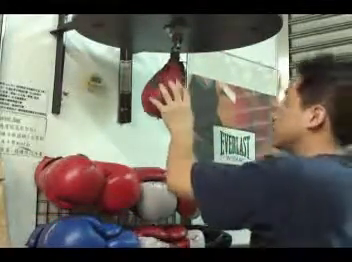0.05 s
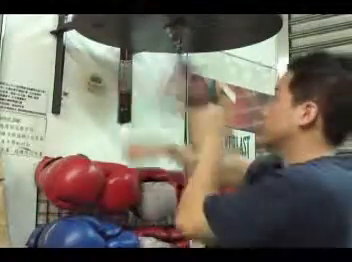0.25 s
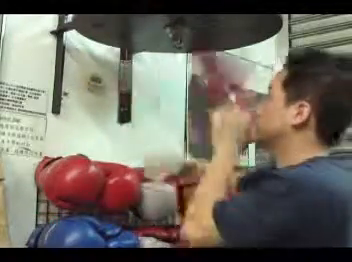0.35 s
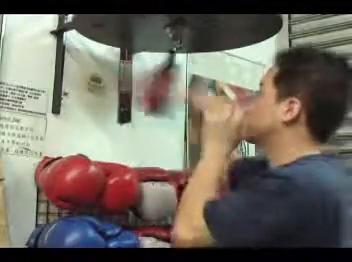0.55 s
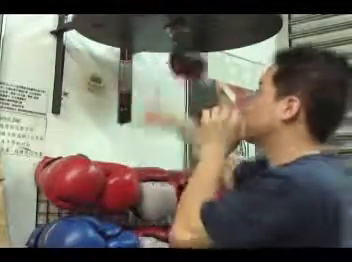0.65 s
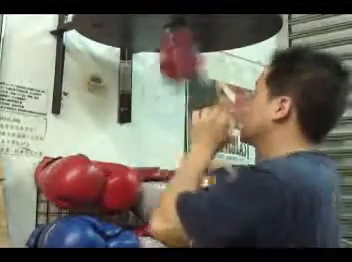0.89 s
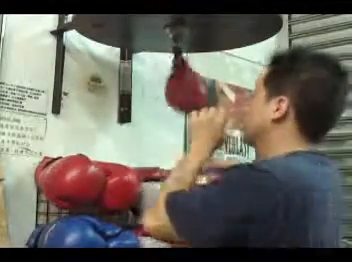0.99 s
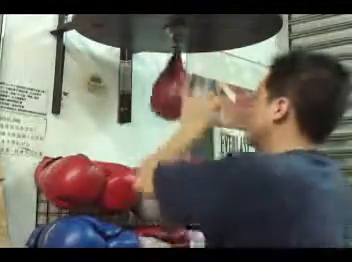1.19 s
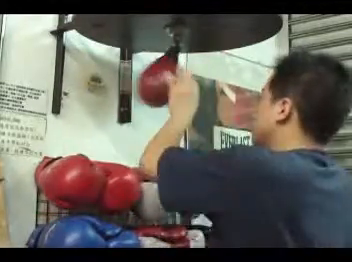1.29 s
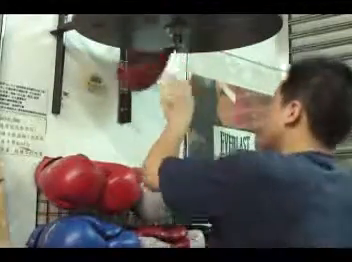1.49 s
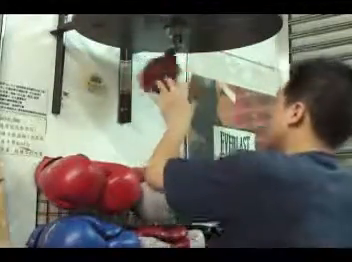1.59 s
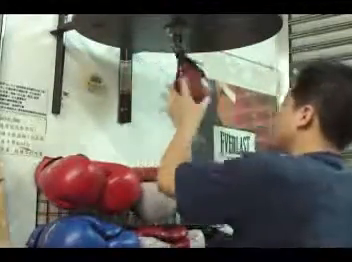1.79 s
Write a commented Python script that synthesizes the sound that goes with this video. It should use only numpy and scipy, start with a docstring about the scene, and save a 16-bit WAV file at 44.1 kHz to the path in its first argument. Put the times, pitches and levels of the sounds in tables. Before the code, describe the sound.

A leather speed bag is punched three times, thudding rapidly against its wooden platform.

```python
"""A leather speed bag is punched three times, then caught, in a hard-walled gym.
After each punch it slams to and fro against its round wooden platform, and each impact excites
the board's normal modes: it thumps and rings. The metal swivel clicks, rattles and finally squeaks.
The room reverberates for about a second over a low ventilation rumble."""
import sys
import numpy as np
from scipy import signal
from scipy.fft import rfft, irfft
from scipy.io import wavfile
from scipy.ndimage import uniform_filter1d

SR = 44100
rng = np.random.default_rng(int(sys.argv[2]) if len(sys.argv) > 2 else 0)


def int16_out(signal):
    """Quantize to a 16-bit WAV file."""
    q = np.round(np.clip(np.atleast_2d(signal).T, -1, 1) * 32767)
    wavfile.write(sys.argv[1], SR, q.astype(np.int16))


N = 81585
T = np.arange(N) / SR


def from_db(db):
    """Amplitude ratio of a level in decibels."""
    return 10 ** (np.asarray(db) / 20)


def at_hz(points, hz):
    """Interpolation on a logarithmic frequency axis."""
    f, value = np.transpose(points)
    return np.interp(np.log(np.maximum(hz, 1)), np.log(f), value)


def decay(t, t60):
    """Exponential decay from t = 0, falling 60 dB in t60 seconds."""
    return (t >= 0) * np.exp(-np.log(1000) * np.maximum(t, 0) / t60)


def ring(onset, hz, t60):
    """Free vibration of a damped oscillator struck at the onset."""
    return np.sin(2 * np.pi * hz * (T - onset)) * decay(T - onset, t60)


def delayed(x, seconds):
    """Pure time delay, padded or cut to the scene's length."""
    return np.concatenate([np.zeros(max(int(seconds * SR), 0)), x, np.zeros(N)])[:N]


def noise_bands(spectrum, grain_db=1, grains_per_s=2500):
    """Quarter-octave synthesis: (centre frequency, grainy noise) pairs of total power near 1."""
    edges = np.geomspace(28, 7600, 33)
    centres = np.sqrt(edges[1:] * edges[:-1])
    gains = from_db(at_hz(spectrum, centres)) * np.sqrt(np.diff(edges))
    grains = from_db(grain_db * rng.standard_normal(N))[(T * grains_per_s).astype(int)]
    white = rng.standard_normal((2, N)) * grains
    bands = []
    for k, gain in enumerate(gains / np.linalg.norm(gains)):
        sos = signal.butter(2, edges[k:k + 2], "band", fs=SR, output="sos")
        source = white[k % 2]  # adjacent bands are uncorrelated
        band = signal.sosfilt(sos, np.concatenate([source[-SR // 10:], source]))[-N:]
        running_rms = np.sqrt(uniform_filter1d(band * band, size=3000) + 1e-20)
        bands.append((centres[k], gain * band / running_rms))
    return bands


# Spectral density of the room air: f/Hz, level/dB
AIR_SPECTRUM = [(25, -5.5), (50, -1), (75, -2), (115, 1.5), (160, -11.5), (200, -5), (320, -14.5),
                (600, -14.5), (1000, -15), (1800, -26.5), (3700, -30), (5500, -38.5), (7300, -65.5)]
def ventilation(air_db=-38.5, hum_hz=48.1, hum_db=-40):
    """Stationary broadband air noise superposed on a low pure tone."""
    air = sum(band for _, band in noise_bands(AIR_SPECTRUM, grain_db=0))
    return from_db(air_db) * air + from_db(hum_db) * np.sin(2 * np.pi * hum_hz * T)


def shelves_db(hz, bass_db, treble_db, bass_hz=278, treble_hz=1310):
    """Shelving response: the bass and treble balance of one impact."""
    return bass_db / (1 + (hz / bass_hz) ** 4) + treble_db / (1 + (treble_hz / (hz + 1)) ** 4)


def crack(spectrum, bass_db=0, treble_db=0, size=4096):
    """Minimum-phase pulse: the most compact causal transient with a given spectrum, peak 1."""
    hz = np.arange(size // 2 + 1) * SR / size
    magnitude = from_db(at_hz(spectrum, hz) + shelves_db(hz, bass_db, treble_db))
    cepstrum = irfft(np.log(magnitude))
    pulse = irfft(np.exp(rfft(2 * cepstrum[:size // 2], size)))
    return np.pad(pulse / np.abs(pulse).max(), (0, N - size))


# Reverberation time of the gym: f/Hz, T60/s
ROOM_T60 = [(50, 1), (130, .75), (300, 1), (800, 0.7), (2000, 0.84), (4500, 0.76), (7000, 1)]
def reverberation(events, spectrum, shudder_db=-14, room_db=0.5):
    """Incoherent addition: the impacts' tails, each a mount shudder and a room decay, sum in power."""
    out = np.zeros(N)
    shudder = from_db(shudder_db) * decay(T, t60=0.081)
    for hz, noise in noise_bands(spectrum):
        tail = shudder + from_db(room_db) * decay(T, at_hz(ROOM_T60, hz))
        power = np.zeros(N)
        for onset, db, bass_db, treble_db, rise_s, *_ in events:
            gain = from_db(db + shelves_db(hz, bass_db, treble_db))
            power += (gain * delayed(tail * np.minimum(T / rise_s, 1), onset)) ** 2
        out += noise * np.sqrt(power)
    return out


def board_resonance(x, bandwidth_hz=14.3, lift_db=6.5):
    """Resonant filtering: the board's upper modes colour a sound, its rms unchanged."""
    out = x.copy()
    for hz, _, _ in BOARD_MODES[3:]:
        resonator = signal.iirpeak(hz, hz / bandwidth_hz, fs=SR)
        out += (from_db(lift_db) - 1) * signal.lfilter(*resonator, x)
    return out * np.std(x) / np.std(out)


def impacts(events, spectrum, echo_s=0.0035, crack_echo_db=-5.5, knock_echo_db=-3.5):
    """Direct crack and hollow knock, their early reflection off the platform, and a diffuse tail."""
    out = board_resonance(reverberation(events, spectrum))
    for onset, _, bass_db, treble_db, _, crack_db, knock_db, knock_hz, *_ in events:
        pulse = from_db(crack_db) * crack(spectrum, bass_db, treble_db)
        knock = from_db(knock_db) * ring(0, knock_hz, t60=0.024)
        echo = from_db(crack_echo_db) * pulse + from_db(knock_echo_db) * knock
        out += delayed(pulse + knock, onset) + delayed(echo, onset + echo_s)
    return out


# Hand contacts, plus one quick rebound of the bag at 0.7255 s: t/s, tail level/dB, bass/dB, treble/dB, tail
# rise/s, # crack level/dB, knock level/dB, knock f/Hz
PUNCHES = [(0.2315, -21, -2.5, -12.5, 0.0007, -39.5, -12.5, 956),
           (0.682, -20.5, -6, 1, .002, -20, -12, 873), (0.7165, -19.5, -2, 0.5, 0.0021, -24, -13, 950),
           (0.7255, -26.5, -3.5, -9.5, .003, -12, -7.5, 607), (1.162, -23, -0.5, 7, 0.00083, -9, -15, 1070),
           (1.801, -43, 2, -7, .004, -61, -44, 950)]
# Spectral density of hand on leather: f/Hz, level/dB
PUNCH_SPECTRUM = [(35, 1.5), (110, 7), (260, 7), (430, -0.5), (700, 0.5), (1000, 3), (1400, 0),
                  (2000, -7.5), (2900, -8.5), (3550, -29), (4500, -13), (5800, -47.5), (7300, -44)]
def punches():
    """Impulsive excitation of the leather bag by the hand, and one quick rebound of the bag."""
    return impacts(PUNCHES, PUNCH_SPECTRUM)


# Spectral density of the metal swivel: f/Hz, level/dB
SWIVEL_SPECTRUM = [(500, -25), (2500, -1), (3500, -3.5), (4600, 8), (5400, -4), (6200, -17.5), (7200, -21)]
# Snaps of the swivel in its seat: t/s, level/dB
CLICKS = [(0.28, -5), (0.4054, -11), (0.572, -20), (0.691, -22), (0.753, -12.5), (0.926, -13.5),
          (1.163, -29)]
def swivel_clicks(metal_noise, snap_db=-9, room_db=-28):
    """Brief metal contact gives a bright pulse, a noise burst and faint reverberation."""
    snap = from_db(snap_db) * decay(T, t60=0.006)
    room = from_db(room_db) * decay(T, at_hz(ROOM_T60, 4600))
    pulse = 0.5 * crack(SWIVEL_SPECTRUM)
    return sum(from_db(db) * (delayed(pulse, onset) + metal_noise * delayed(snap + room, onset))
               for onset, db in CLICKS)


# Bag on platform: t/s, tail and thump level/dB, bass/dB, treble/dB, tail rise/s,
# crack level/dB, knock level/dB, knock f/Hz, board ring level/dB
REBOUNDS = [(0.281, -15.5, 6.5, 3, 0.00046, -11.5, -6, 870, -26),
            (0.406, -15.5, 3.5, -1.5, 0.0015, -20, -33, 1000, -22),
            (0.571, -24.5, 0, 1, .008, -39, -35.5, 480, -28),
            (0.607, -21, 1, -18, 0.0014, -32, -24, 560, -26.5),
            (0.752, -23, 4.5, 1.5, .001, -18.5, -7, 1028, -28.5),
            (0.786, -23, -2, 0, 0.0045, -32, -35, 910, -20),
            (0.9349, -21.5, 4, -2.5, .003, -21, -12.5, 980, -29.5),
            (0.975, -34.5, 15, -7, .008, -57, -12.5, 205, -36),
            (1.326, -31.5, 2, -17, 0.0037, -24.5, -24, 930, -38.5),
            (1.352, -26, -7, -4, 0.0041, -20, -16.5, 420, -30.5),
            (1.412, -32, -3.5, -15, .004, -49, -13.5, 366, -39.5)]
# Spectral density of leather on wood: f/Hz, level/dB
REBOUND_SPECTRUM = [(35, 1.5), (70, -4.5), (105, 4.5), (165, -2.5), (230, 2), (330, -6), (480, -1.5),
                    (650, -2), (950, 1), (1250, -6.5), (2000, -9.5), (2800, -11.5), (3600, -22.5),
                    (4900, -23), (6000, -44), (7300, -45.5)]
def rebounds():
    """Impact noise of the swinging bag colliding with its platform."""
    return impacts(REBOUNDS, REBOUND_SPECTRUM)


# Normal modes of the platform: f/Hz, level/dB, T60/s
BOARD_MODES = [(105.5, -1.5, 0.2), (135.5, -2, 0.35), (260.8, -2.5, 0.63), (343.3, -12.5, 0.88),
               (439.6, -12.5, .6), (580, -10.5, 0.7), (637.8, -7, 0.38), (729, -24, .7), (862.4, -16, 0.17),
               (906, -2.5, 0.3), (976, -10, 0.17), (1087.4, -15, 0.82), (1385, -16.5, 1),
               (1588, -36.5, 0.24), (1728, -22, 0.2)]
def board(contact_s=0.0021, scatter_db=3):
    """Modal superposition: each rebound excites a low thump and randomly weighted modes."""
    out = np.zeros(N)
    for onset, db, bass_db, *_, ring_db in REBOUNDS:
        out -= from_db(db + bass_db) * ring(onset + contact_s, hz=140, t60=0.12)
        for hz, mode_db, t60 in BOARD_MODES:
            out += from_db(ring_db + mode_db + scatter_db * rng.normal()) * ring(onset, hz, t60)
    return out


# Drones of the platform's frame: t/s, level/dB, f/Hz
DRONES = [(0.425, -15, 264.4), (0.95, -23, 256)]
def frame_drone(rise_s=0.071, t60=0.33):
    """Resonance of the frame after hard rebounds: a tone builds up, then decays."""
    out = np.zeros(N)
    for onset, db, hz in DRONES:
        t = T - onset
        envelope = np.clip(t / rise_s, 0, 1) * decay(np.maximum(t - rise_s, 0), t60)
        out += from_db(db) * envelope * np.sin(2 * np.pi * hz * t)
    return out


# Rattles as the bag swings back: t/s, level/dB
RATTLES = [(0.565, -44.5), (0.68, -35.5), (1.325, -42)]
def swivel_rattles(metal_noise, rise_s=0.023, t60=0.6):
    """Amplitude-modulated noise: each rattle swells quickly and decays exponentially."""
    envelope = np.minimum(T / rise_s, 1) * decay(T, t60)
    return metal_noise * sum(from_db(db) * delayed(envelope, onset) for onset, db in RATTLES)


# Squeaks as the bag comes to rest: peak t/s, f/Hz, level/dB
SQUEAKS = [(1.389, 3026, -44), (1.535, 3150, -51), (1.632, 1884, -46)]
def swivel_squeaks(half_width_s=0.021, bandwidth_hz=150):
    """Friction at the swivel's ball: narrow-band noise under a Gaussian envelope."""
    out = np.zeros(N)
    for peak_s, hz, db in SQUEAKS:
        edges = [hz - bandwidth_hz / 2, hz + bandwidth_hz / 2]
        sos = signal.butter(2, edges, "band", fs=SR, output="sos")
        rub = signal.sosfilt(sos, rng.standard_normal(N))
        rub /= np.sqrt(np.mean(rub ** 2))
        out += from_db(db) * rub * np.exp(-((T - peak_s) / half_width_s) ** 2)
    return out


def scene():
    """Linear superposition of bag, platform, swivel and ventilation in one channel."""
    bag = punches() + rebounds()
    platform = board() + frame_drone()
    metal_noise = sum(band for _, band in noise_bands(SWIVEL_SPECTRUM))
    swivel = swivel_clicks(metal_noise) + swivel_rattles(metal_noise) + swivel_squeaks()
    return (bag + platform + swivel + ventilation())[None]


def record(dry, low_hz=16, high_hz=7200, ceiling=1.2):
    """Band limiting and soft saturation: the deepest bass and top treble go, and peaks are rounded."""
    highpass = signal.butter(2, low_hz, "high", fs=SR, output="sos")
    lowpass = signal.ellip(10, 0.2, 70, high_hz, fs=SR, output="sos")
    rounded = ceiling * np.tanh(signal.sosfilt(highpass, dry) / ceiling)
    return signal.sosfilt(lowpass, rounded)


dry = scene()
out = record(dry)
int16_out(out)
```